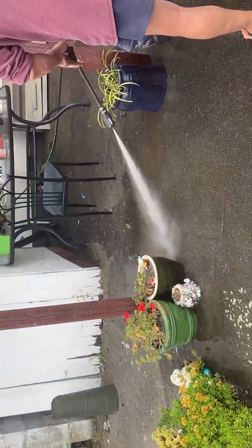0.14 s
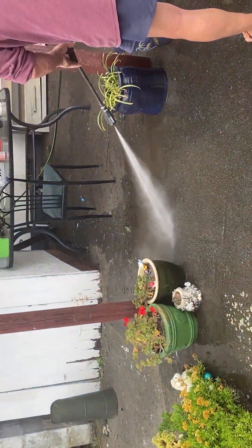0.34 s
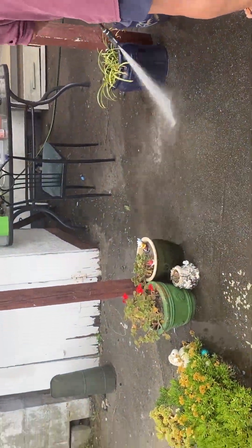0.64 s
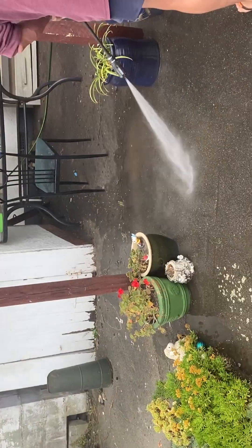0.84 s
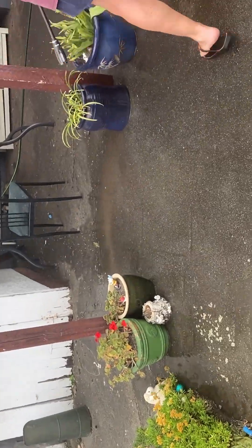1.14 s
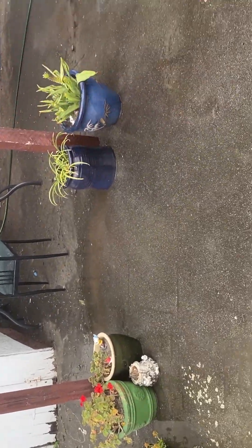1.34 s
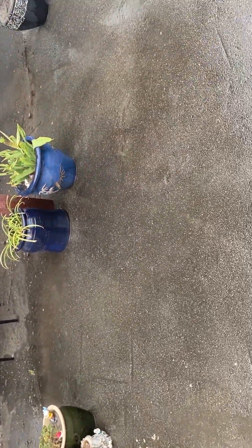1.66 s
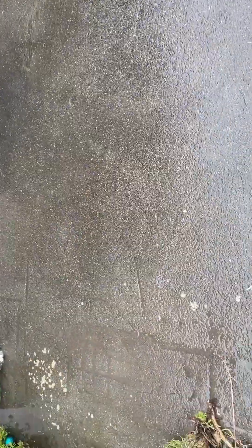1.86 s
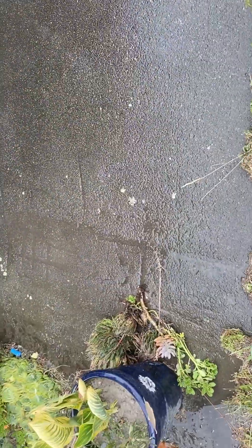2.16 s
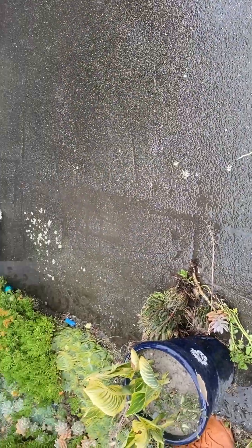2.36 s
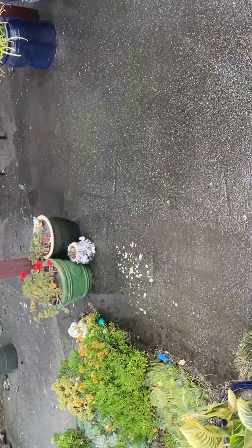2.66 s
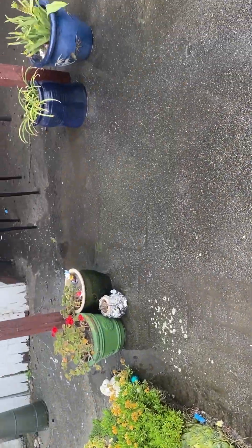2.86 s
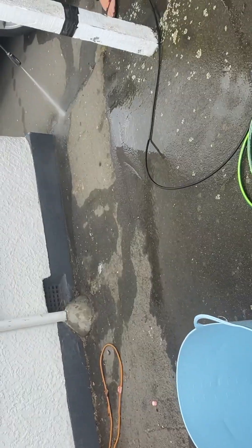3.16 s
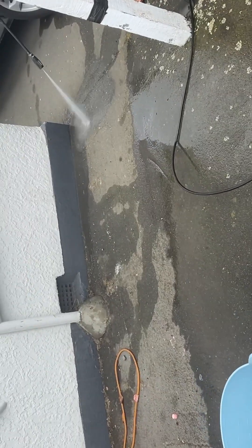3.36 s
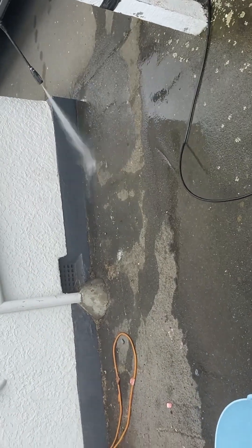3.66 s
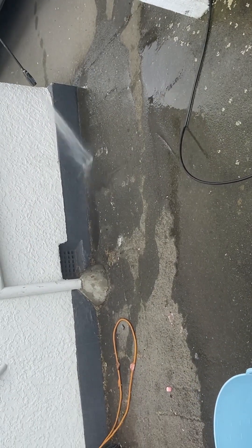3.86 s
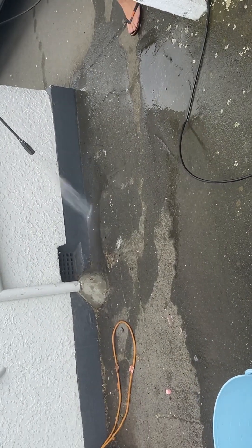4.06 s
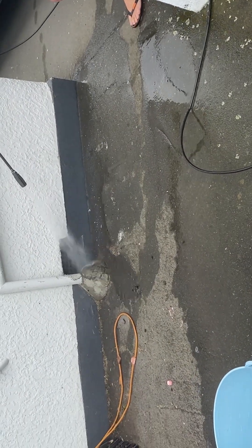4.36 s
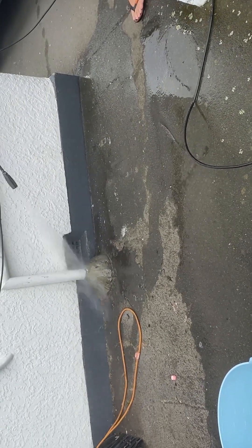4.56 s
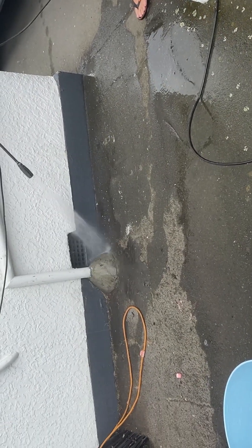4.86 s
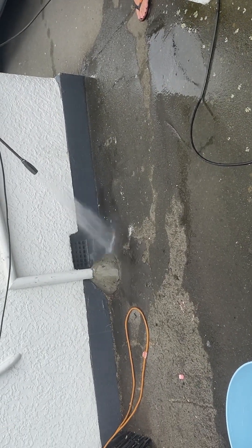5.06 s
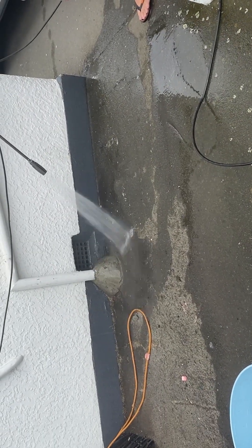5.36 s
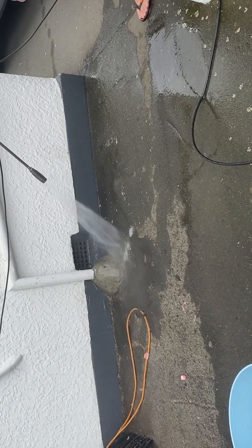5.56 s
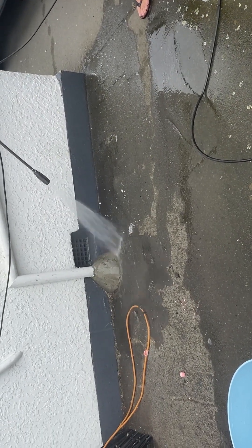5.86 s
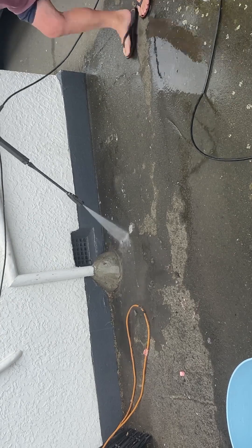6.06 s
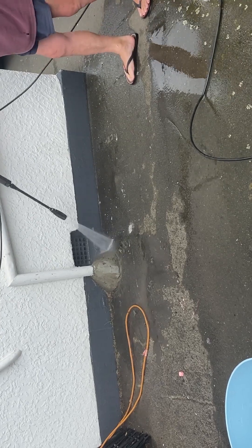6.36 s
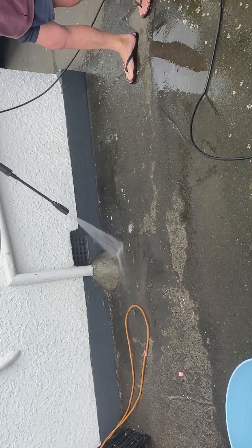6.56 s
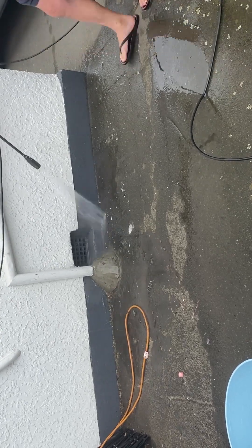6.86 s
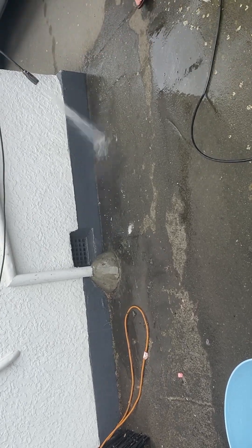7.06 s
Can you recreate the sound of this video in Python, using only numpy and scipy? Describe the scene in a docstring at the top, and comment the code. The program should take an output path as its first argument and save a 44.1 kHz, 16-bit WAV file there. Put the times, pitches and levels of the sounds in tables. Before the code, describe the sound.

A fine jet of water hisses on outdoor paving over the whine of a pressure washer's pump, then both stop quickly. The short lull holds thin splutters, drips, a few knocks and a faraway traffic rumble. The spray and motor return abruptly, closer and stronger, and run on to the end, with low hollow booms as the jet crosses a drain by a wall. The sound is in stereo with slight short echoes.

```python
"""A paved yard, where an electric pressure washer is at work. Its motor and pump whine and rattle while a jet
of fine drops hisses on the concrete. The jet stops, water splutters and dribbles, and a few things knock over
the sound of distant traffic. Then the scene changes: the washer runs nearer and louder, its jet drumming now
and then on a hollow drain at the foot of a wall."""
import sys
import numpy as np
from scipy import signal
from scipy.fft import rfft, irfft
from scipy.io import wavfile
from scipy.ndimage import uniform_filter1d

SR = 44100
rng = np.random.default_rng(int(sys.argv[2]) if len(sys.argv) > 2 else 0)


def generate_wav(signal):
    """Clip the signal to [-1, 1] and save it as 16-bit WAV at the path in sys.argv[1]."""
    frames = np.transpose(np.atleast_2d(signal))
    scaled = np.clip(frames, -1, 1) * 32767
    pcm = np.round(scaled).astype(np.int16)
    wavfile.write(sys.argv[1], SR, pcm)


N = 318402
TIME = np.arange(N) / SR
FREQ = np.maximum(np.arange(N // 2 + 1) * SR / N, 1)
EARS = np.array([[1], [-1]])  # left, right

TRIGGER_OFF_S, JET_FALL_DB_PER_S = 1.03, 220
PUMP_OFF_S, PUMP_FALL_DB_PER_S = 1.06, 260
WALL_START_S, WALL_RISE_S = 3.048, .024

# The hiss of the jet by the wall: pitch_hz, level_db
WALL_HISS = [(60, -56), (150, -9), (320, -6.5), (620, 1.5), (950, 5.5), (2000, 3), (3600, 5.5), (4800, 3),
             (6500, 1), (9200, -1), (12000, 2), (15500, 2.5)]
# Thin rings of the nozzle: pitch_hz, width_hz, level_db
NOZZLE_RINGS = [(4175, 18, -0.5), (5160, 17, 0), (7700, 78, -1.5), (8100, 35, -3.5), (12000, 63, -9.5)]
# How strong each of the MOTOR_TONES is within the pump's sound: level_db
WALL_TONES_DB = [-14, -21.5, -26.5, -26, -28, -11, -16.5, -10, -12.5, -13.5, -16.5, -23, -20.5, -28, -18.5,
                 -20, -19.5, -20]
# Where the pump's housing rings: pitch_hz, width_hz, level_db
WALL_HOUSING = [(990, 86, -6), (1126, 91, -2), (1397, 34.6, 6.5), (1485, 75, 2), (1738, 53, 3.5),
                (1916, 46, -1), (2178, 84, -3.5), (2650, 290, -8), (3100, 320, -15)]
# Standing waves by the wall briefly lift or sink a tone: middle_s, shaft_multiple, gain_db, half_length_s
STANDING_WAVES = [(3.12, 3, 15, 0.45), (6.35, 3, 12.5, .17), (3.51, 4, -12, 0.11), (5.25, 4, -5, 0.19)]
# Stereo width, or how unlike left and right are: pitch_hz, width_db
WALL_STEREO = [(60, -11), (200, -64), (380, -31), (700, -12), (1290, -14.5), (2380, -5), (4400, -6.5),
               (7000, 1.5), (9000, -19), (15000, -22)]
def spray_wall(hiss_db=-28, pump_db=-28.5, nozzle_db=-15, sink_db_per_s=.19):
    """Spraying beside the machine; the hiss sinks slowly as the lance moves off."""
    hiss = jet(WALL_HISS, WALL_STEREO, grain_db=1.5, flicker_db=.49)
    hiss += amp(nozzle_db) * noise(resonances(NOZZLE_RINGS), WALL_STEREO)
    hiss *= amp(hiss_db - sink_db_per_s * (TIME - WALL_START_S))
    lifts_db = {}
    for s, multiple, db, half in STANDING_WAVES:
        lifts_db[multiple] = lifts_db.get(multiple, 0) + db * hump(s, half)
    hum = pump(WALL_TONES_DB, WALL_HOUSING, WALL_STEREO, lifts_db, shaft_hz=279.7, rattle_db=-3)
    return (hiss + amp(pump_db) * hum) * wall_fade_in()


# The hiss of the jet on open concrete: pitch_hz, level_db
PATIO_HISS = [(60, -44), (150, -2), (270, 12), (520, 3.5), (900, 7), (2000, 4), (3000, 2.5), (4800, 0.5),
              (6500, 1), (8300, 4), (12000, 4), (15500, 4.5)]
# How strong each of the MOTOR_TONES is from farther away: level_db
PATIO_TONES_DB = [-17.5, -46, -35, -21.5, -18, -13.5, -11, -13.5, -12.5, -30, -16.5, -24, -16.5, -17, -22,
                  -17.5, -21, -19.5]
# Where the housing rings while the pump runs, and as it stops: pitch_hz, width_hz, level_db
PATIO_HOUSING = [(1110, 120, -5), (1250, 98, -2.5), (1440, 150, -1.5), (1660, 120, -4), (1950, 90, -4.5),
                 (2200, 220, -8), (2610, 89, -7.5)]
STOPPING_RINGS = [(1150, 94, -2), (2600, 1400, -18)]
# Stereo width in the open: pitch_hz, width_db
PATIO_STEREO = [(200, -19), (700, -15.5), (1290, -9), (2380, -1.5), (4400, -2), (6500, -0.5), (8500, -32),
                (15000, -46)]
def spray_patio(hiss_db=-33.5, pump_db=-38, ring_db=-44):
    """Spraying away from the machine, until the trigger is let go and the pump dies away."""
    hiss = amp(hiss_db) * jet(PATIO_HISS, PATIO_STEREO, grain_db=2, flicker_db=.94)
    hiss *= release(TRIGGER_OFF_S, JET_FALL_DB_PER_S)
    hum = pump(PATIO_TONES_DB, PATIO_HOUSING, PATIO_STEREO, {}, shaft_hz=278.8, rattle_db=-2.5)
    hum *= amp(pump_db) * release(PUMP_OFF_S, PUMP_FALL_DB_PER_S)
    ring = burst(1.104, swell_s=.05, fade_s=.04) * noise(resonances(STOPPING_RINGS), PATIO_STEREO)
    return hiss + hum + amp(ring_db) * ring


# Short echoes from paving, kerb and walls: delay_s, level_db
ECHOES = [(.0023, -21.5), (.0047, -29), (.0081, -15), (0.0124, -14)]
def jet(spectrum, stereo, grain_db, flicker_db, drift=.012):
    """Fine drops hit concrete in a flickering flow; the echoes drift as lance and listener move."""
    direct = noise(colour(spectrum), stereo, droplets(grain_db))
    hiss = direct
    for delay_s, db in ECHOES:
        earlier = np.arange(N) - SR * delay_s * (1 + drift * wander(.8))
        hiss = hiss + amp(db) * direct[:, np.rint(earlier).astype(int) % N]
    return unit(hiss) * amp(flicker_db * wander(30))


# Motor and gear tones, each a sum of three rates: shaft_multiple, piston_multiple, mains_multiple
MOTOR_TONES = [(1, 0, 0), (1, 0, 1), (2, 0, 0), (2, 0, 1), (3, 0, 0), (4, 0, 0), (5, 0, 0), (5, 1, 0),
               (6, 0, 0), (6, 1, 0), (7, 0, 0), (8, 0, 1), (9, 0, 0), (10, 0, 0), (10, 1, 0), (12, 0, 0),
               (13, 0, 0), (15, 0, 0)]
def pump(tones_db, housing, stereo, lifts_db, shaft_hz, rattle_db, piston_hz=107.6, mains_buzz_hz=120):
    """Motor and gears whine; every shaft turn and piston stroke rattles the housing."""
    speed = 1 + .002209 * (wander(22) + wander(2) / 2)
    turn = 2 * np.pi * np.cumsum(speed) / SR
    shaft, piston = shaft_hz * turn, piston_hz * turn
    mains = 2 * np.pi * mains_buzz_hz * TIME
    whine, width = 0, colour(stereo)
    for (per_turn, per_stroke, per_buzz), db in zip(MOTOR_TONES, tones_db):
        phase = per_turn * shaft + per_stroke * piston + per_buzz * mains + rng.uniform(0, 2 * np.pi)
        sway_db = 1.18 * wander(2.21)  # slow swells in the yard's standing waves
        flutter = 1 + .23 * min(per_turn / 4, 1) * wander(60)  # loose gears shake high tones most
        level = amp(db + lifts_db.get(per_turn, 0) + sway_db) * flutter
        # left and right hear each tone a little out of step
        skew = np.arctan(np.interp(per_turn * shaft_hz, FREQ, width)) * rng.choice([-1, 1])
        whine += np.sqrt(2) * level * np.sin(phase + EARS * skew)
    pulses = np.cos(shaft) + 1.1 * np.cos(piston) + .5 * np.cos(shaft + piston) + .22 * np.cos(2 * shaft)
    rattle = noise(resonances(housing), stereo, drive=1 + .22 * pulses)
    return whine + amp(rattle_db) * rattle


# The jet sweeps across the drain: middle_s, level_db, half_length_s
DRAIN_PASSES = [(3.17, -53, 0.17), (4.424, -35, 0.25), (4.853, -40, 0.18), (5.192, -47, 0.18),
                (5.94, -50, 0.085), (6.45, -44.5, .06), (6.844, -38.5, 0.052)]
# Where the drain rings: pitch_hz, width_hz, level_db
DRAIN_RINGS = [(193.4, 22, -2.5), (265, 30, -3), (313, 50, 1.5), (413, 48, -6), (530, 33, -4.5),
               (750, 69, -7)]
def drain(stray_spray_db=-49.5, low_cut_hz=110):
    """The hollow drain booms when the jet finds it, and softly under stray spray in between."""
    level = amp(stray_spray_db) + sum(amp(db) * hump(s, half) for s, db, half in DRAIN_PASSES)
    hollow = resonances(DRAIN_RINGS) / (1 + (low_cut_hz / FREQ) ** 4)
    return level * noise(hollow, WALL_STEREO) * wall_fade_in()


# Moments when the jet bites harder: middle_s, level_db, half_length_s
SIZZLES = [(.85, -45, 0.29), (3.3, -41.5, 0.3)]
def sizzle(pitch_hz=3870, width_hz=1800, low_cut_hz=500):
    """The running jet rasps brightly where it meets bare concrete close by."""
    flowing = release(TRIGGER_OFF_S, JET_FALL_DB_PER_S) + wall_fade_in()
    level = sum(amp(db) * hump(s, half) for s, db, half in SIZZLES)
    rasp = resonances([(pitch_hz, width_hz, 0)]) / (1 + (low_cut_hz / FREQ) ** 2)
    return flowing * level * noise(rasp, WALL_STEREO, droplets(2.5))


def valve(level_db=-36):
    """The closing trigger valve squeezes out one thin whistle."""
    whistle = noise(resonances([(14200, 600, 0), (10000, 3000, -17)]), PATIO_STEREO)
    return amp(level_db) * burst(1.092, swell_s=.012, fade_s=.014) * whistle


# Spits of water: peak_s, level_db, pitch_hz, fade_s
SPITS = [(1.347, -43.5, 6900, .015), (1.493, -38.5, 8300, 0.0084), (1.641, -38, 10800, .008),
         (1.778, -36.5, 11400, .007), (1.94, -41, 10900, 0.0099), (2.096, -43.5, 9800, 0.0094),
         (2.256, -44.5, 9400, 0.024), (2.619, -46, 9500, .011), (2.658, -52, 8000, .012),
         (2.715, -51.5, 8870, .008), (2.779, -51, 9500, .012), (2.939, -42, 9700, 0.017)]
# Stereo width of the spits and the other sounds around the yard: pitch_hz, width_db
YARD_STEREO = [(100, -28), (400, -14.5), (1290, -9), (2380, -2.5), (4400, 2.5), (8120, -5), (15000, -21)]
def splutter(width_hz=4800, low_cut_hz=4000, swell_s=.0045, ragged_db=3):
    """Water spits: tiny bubbles ring, an air pocket snaps, then a fine mist settles."""
    out = 0
    drops = droplets(1) * amp(ragged_db * wander(700))
    for s, db, hz, fade_s in SPITS:
        bubbles = resonances([(bubble_hz, 260, 3) for bubble_hz in rng.uniform(4730, 17000, size=6)])
        bright = resonances([(hz, width_hz, 0)]) * (1 + bubbles) / (1 + (low_cut_hz / FREQ) ** 3)
        snap = amp(-7) * burst(s, swell_s=.00027, fade_s=.00042)
        mist = amp(-27) * burst(s, swell_s, fade_s=.024)
        level = burst(s, swell_s, fade_s) + snap + mist
        out += amp(db) * level * noise(bright, YARD_STEREO, drops)
    return out


# Hard knocks: peak_s, level_db, pitch_hz, fade_s
KNOCKS = [(1.438, -44, 745, 0.0017), (2.274, -34.5, 1192, 0.0037), (2.28, -36.5, 1150, 0.0061),
          (2.653, -33, 2050, 0.01), (2.657, -40.5, 880, 0.014)]
# Where the knocked plastic rings: pitch_hz, width_hz, level_db
PLASTIC_RINGS = [(600, 50, -6), (830, 70, -6), (1040, 62, -0.5), (1260, 73, 2), (1410, 80, -1),
                 (1884, 47, 1.5), (2150, 110, -3), (2600, 300, -8), (3400, 800, -2)]
def knocks(swell_s=.0003, echo_db=-19, echo_fade_s=.027):
    """Hard plastic clacks and dies at once, with a short slap back from the yard."""
    out = 0
    for s, db, hz, fade_s in KNOCKS:
        level = burst(s, swell_s, fade_s) + amp(echo_db) * burst(s, swell_s, echo_fade_s)
        clack = resonances(PLASTIC_RINGS) * resonances([(hz, .27 * hz, 0)])
        out += amp(db) * level * noise(clack, YARD_STEREO)
    return out


# Soft thuds: peak_s, level_db, pitch_hz, fade_s, overtone_db
THUDS = [(.382, -30.5, 277, 0.0055, -3), (.421, -33.5, 230, 0.0052, -15), (1.888, -40, 248, 0.011, 3),
         (1.921, -38, 183, 0.0062, -15), (2.822, -34.5, 203, .006, -22), (4.596, -25.5, 285, 0.023, -18)]
def thuds(swell_s=.001, overtone_ratio=2.05):
    """Soft blows ring for a few low cycles, each with a shorter, higher overtone."""
    out = 0
    for s, db, hz, fade_s, overtone_db in THUDS:
        phase = 2 * np.pi * hz * (TIME - s)
        low = burst(s, swell_s, fade_s) * np.sin(phase)
        overtone = burst(s, swell_s, .4 * fade_s) * np.sin(overtone_ratio * phase)
        out += np.sqrt(2) * amp(db) * (low + amp(overtone_db) * overtone)
    return cut_bass(out, below_hz=110)


# Slops of water: start_s, level_db, hold_s
SPLASHES = [(1.862, -64, .008), (1.939, -56, 0.0074), (2.066, -57.5, 0.016), (2.264, -56, 0.29),
            (2.652, -54, 0.048), (2.969, -50.5, 0.03)]
# The sound of water landing on paving: pitch_hz, level_db
SPLASH_COLOUR = [(300, -20), (900, 0), (1500, -2), (2300, 2), (3000, -3), (4200, -8.5), (8000, -14),
                 (15000, -16)]
def patter(dribble_db=-66, drops_per_s=22, drop_db=-64, drop_fade_s=.005):
    """While the jet is off, water dribbles and slops onto the paving and stray drops tick."""
    slops = sum(amp(db) * burst(s, .0083, .018, hold_s) for s, db, hold_s in SPLASHES)
    flow = (amp(dribble_db) + slops) * amp(1.8 * wander(90))
    wash = flow * noise(colour(SPLASH_COLOUR), YARD_STEREO, droplets(3.6))
    hits = (rng.random(N) < drops_per_s / SR) * amp(drop_db + 6 * rng.uniform(-.88, 1, N))
    fading_hits = signal.lfilter([1], [1, -np.exp(-1 / (drop_fade_s * SR))], hits)
    ticks = fading_hits * noise(resonances([(10500, 6000, 0)]), YARD_STEREO, droplets(2))
    paused = (TIME > PUMP_OFF_S) & (TIME < WALL_START_S + WALL_RISE_S)
    return (wash + ticks) * paused


# One pull of a far engine for each gear: middle_s, half_length_s, pitch_hz, rise_hz_per_s, level_db
GEARS = [(1.33, .32, 398, 225, -56), (2.4, .36, 341, 20, -60), (5.05, .3, 570, 70, -51.5)]
# The outdoor rumble: pitch_hz, level_db
RUMBLE = [(30, -45), (80, -32), (130, -10), (180, 0.5), (240, 2.5), (400, -3), (560, -10), (970, -13),
          (1400, -16), (2550, -31), (4200, -27.5), (6700, -37), (11000, -36), (15500, -36)]
def traffic(rumble_db=-53, waver_db=3, wobble=.0071):
    """Distant traffic rumbles, with one engine gliding up through its gears."""
    engine = 0
    for s, half, hz, rise, db in GEARS:
        pitch_hz = (hz + rise * (TIME - s)) * (1 + wobble * wander(40))
        tone = np.sqrt(2) * np.sin(2 * np.pi * np.cumsum(pitch_hz) / SR)
        engine += amp(db + waver_db * wander(23)) * hump(s, half) * tone
    return engine + amp(rumble_db + .7 * wander(14)) * noise(colour(RUMBLE), YARD_STEREO)


def amp(db):
    """Turn decibels into a gain."""
    return 10 ** (np.asarray(db) / 20)


def unit(x):
    """Scale to an average (rms) level of 1."""
    return x / np.sqrt(np.mean(x ** 2))


def colour(points):
    """A gain for every frequency, joining up (pitch_hz, level_db) points."""
    hz, db = np.transpose(points)
    return amp(np.interp(np.log(FREQ), np.log(hz), db))


def resonances(rings):
    """A gain for every frequency, with a peak at each (pitch_hz, width_hz, level_db)."""
    return np.sqrt(sum((amp(db) / (1 + ((FREQ - hz) / width) ** 2)) ** 2 for hz, width, db in rings))


def cut_bass(x, below_hz):
    """Thin out the low end."""
    return signal.sosfilt(signal.butter(2, below_hz, "highpass", fs=SR, output="sos"), x)


def wander(rate_hz):
    """A smooth random curve that takes rate_hz new turns a second."""
    hold = int(SR / rate_hz)
    steps = np.repeat(rng.standard_normal(N // hold + 1), hold)
    return unit(uniform_filter1d(uniform_filter1d(steps, hold), hold)[:N])


def noise(gain, stereo, drive=1):
    """Stereo noise of level 1, shaped in time by drive and in pitch by gain."""
    shared, difference = rfft(rng.standard_normal((2, N)) * drive)
    return unit(irfft(gain * (shared + EARS * colour(stereo) * difference), N))


def droplets(spread_db):
    """Impact sizes: many small drops and a few large ones."""
    return amp(spread_db * np.minimum(rng.exponential(size=N), 5.5))


def burst(s, swell_s, fade_s, hold_s=0):
    """A level that swells up to time s, may hold, and dies away."""
    before, after = (s - TIME) / swell_s, (TIME - s - hold_s) / fade_s
    return np.exp(-np.maximum(np.maximum(before, after), 0))


def hump(s, half_length_s):
    """A smooth rise and fall around time s."""
    return np.exp(-((TIME - s) / half_length_s) ** 2)


def release(s, db_per_s):
    """Full level up to time s, then a steady fall."""
    return amp(-db_per_s * np.maximum(TIME - s, 0))


def wall_fade_in():
    """A quick fade in as the scene changes to the washer by the wall."""
    return np.clip((TIME - WALL_START_S) / WALL_RISE_S, 0, 1)


def scene():
    """Everything in the yard, left and right."""
    washer = spray_wall() + spray_patio() + drain() + sizzle() + valve()
    return washer + splutter() + knocks() + thuds() + patter() + traffic()


# How much louder the left side is than the right: pitch_hz, difference_db
LEFT_LEAN = [(1300, 0), (2600, 0.5), (5000, 2), (7000, 4.5), (8500, 0), (12000, -1)]
def record(dry, low_cut_hz=45, top_hz=15740):
    """The microphones shed deep bass and the very top; the left one is a little brighter."""
    spectrum = rfft(cut_bass(dry, low_cut_hz))
    lean = colour(LEFT_LEAN) ** (EARS / 2)
    top_cut = 1 / np.sqrt(1 + (FREQ / top_hz) ** 1000)
    return irfft(spectrum * lean * top_cut, N)


dry = scene()
out = record(dry)
generate_wav(out)
```